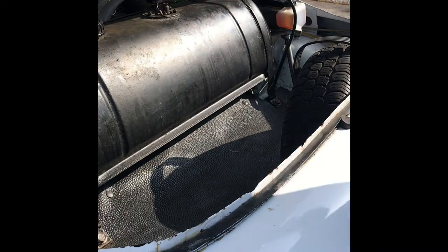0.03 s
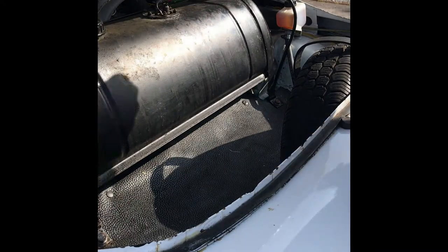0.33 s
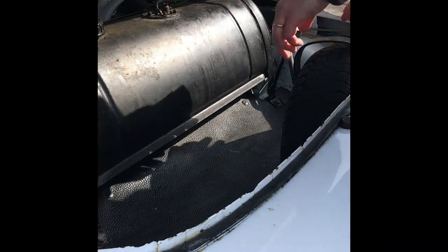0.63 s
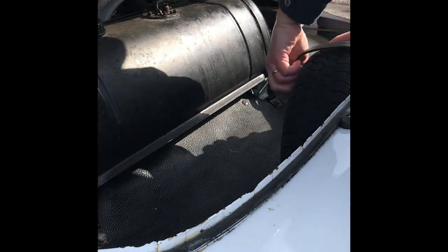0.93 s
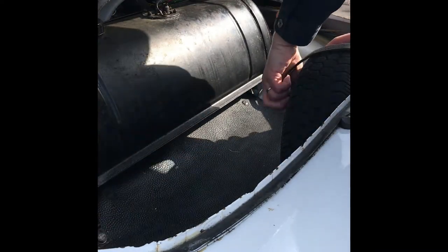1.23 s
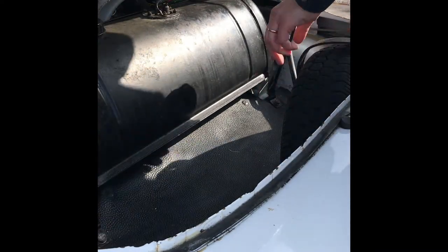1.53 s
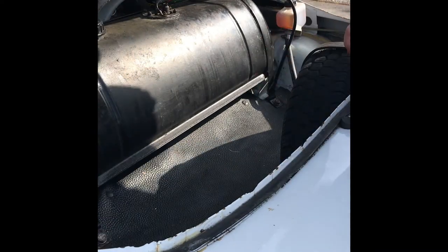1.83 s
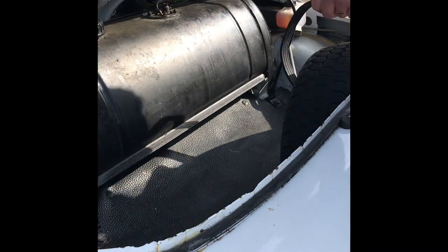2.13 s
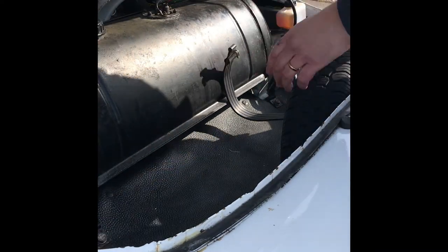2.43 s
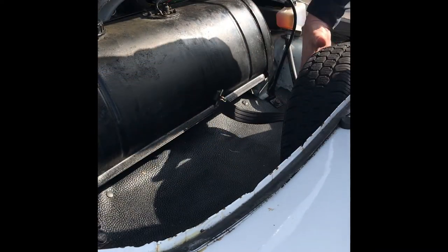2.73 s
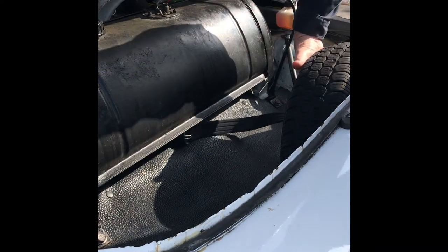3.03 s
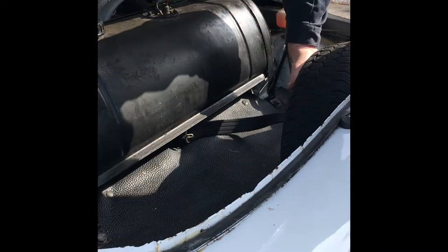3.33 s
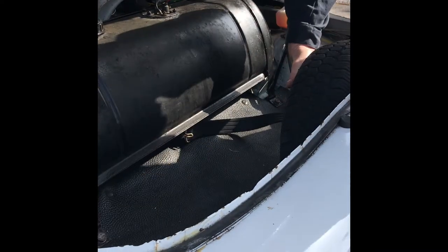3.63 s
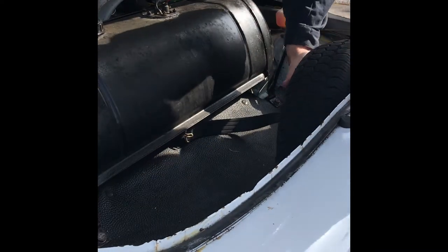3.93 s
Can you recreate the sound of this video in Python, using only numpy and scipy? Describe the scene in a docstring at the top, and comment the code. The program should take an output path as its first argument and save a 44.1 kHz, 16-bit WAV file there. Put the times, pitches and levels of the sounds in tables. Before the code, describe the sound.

Hands work a buckled strap around a spare tyre, bumping panels as birds chirp faintly.

```python
"""A strap is worked by hand around a spare tyre in an open car compartment, outdoors.
Its buckle clinks; it drops, scrapes along and its metal end clacks down. Each hit is decaying modes
plus a noise burst. Knuckles bump the panels and make the compartment boom; small contacts tick.
Sleeves and webbing rustle in tiny slips. Behind it all, small birds chirp over a low rumble."""
import sys
import numpy as np
from scipy import signal
from scipy.fft import rfft, irfft
from scipy.io import wavfile

SR = 44100
rng = np.random.default_rng(int(sys.argv[2]) if len(sys.argv) > 2 else 0)


def generate_wav(sig):
    """Save sig (samples, or channels by samples) to the path in sys.argv[1] as 16-bit PCM at SR."""
    pcm = np.round(np.clip(np.atleast_2d(sig).T, -1, 1) * 32767).astype(np.int16)
    wavfile.write(sys.argv[1], SR, pcm)


N = 176400

# Spectra of air, friction and hits. Each row: frequency in Hz, relative level in dB.
AIR_COLOUR = [(20, -28), (55, 5.5), (75, 0), (170, -9), (400, -17.5), (900, -22.5), (2000, -33.5),
              (15500, -44)]
RUSTLE_BODY_COLOUR = [(150, -10.5), (300, -13.5), (500, 3.5), (850, 5.5), (2500, 1.5), (6000, -16)]
RUSTLE_HISS_COLOUR = [(1500, -27), (3500, 10.5), (6000, 5), (10000, 6), (15500, 0)]
DRAG_COLOUR = [(120, -47), (371, -11), (534, 8.5), (1680, 2), (2210, -13), (15500, -15)]
SLIP_COLOUR = [(120, -33), (544, -5), (1070, -3), (2210, -17.5), (3240, -7.5), (4750, -15), (15500, -25)]
SLEEVE_COLOUR = [(59, -17), (140, -9.5), (310, -1.5), (520, -17), (1000, -18.5), (1260, -13), (1900, -23.5),
                 (15500, -34)]
PULL_COLOUR = [(120, -21.5), (575, -14), (890, 7), (1130, -5), (1540, 3), (1680, -4.5), (8980, -7),
               (15500, -14)]
CLINK_COLOUR = [(700, 18), (1600, 13.5), (2500, 0), (3600, 2), (11000, -12.5), (15000, -15)]
SNAP_COLOUR = [(88, -41), (150, -10.5), (1020, -5), (1800, -13.5), (3040, -4), (5650, -4), (8010, -6.5),
               (15500, -13)]
DROP_COLOUR = [(88, -33), (150, -28), (656, -13), (1090, -2.5), (1660, -11), (15500, -34.5)]
CLACK_COLOUR = [(120, -18), (200, -18), (488, -16), (957, -2.5), (1800, -9), (3750, -3.5), (5010, -22.5),
                (9310, -2), (15500, -12.5)]
# Modes of compartment air, panels, buckle and metal end.
# Each row: frequency in Hz, relative level in dB, T60 in seconds (capped at MAX_MODE_T60_S).
BOOM_MODES = [(119.1, 3.5, .47), (149, -7, .38)]
PANEL_MODES = [(191.6, 2, 0.095), (227.1, -2, 0.48), (270.1, -0.5, .3), (349, -2, 0.24), (466.3, 1, 0.13),
               (593, 1.5, 0.14), (680, 7.5, 0.046), (1213, 3.5, 0.032), (1600, 2, 0.099)]
CLINK_MODES = [(12020, -9.5, 0.038), (4920, -8, 0.03), (2380, -6.5, 0.027), (2067, -2, 0.065),
               (1934, -7.5, 0.084)]
CLACK_MODES = [(927, -1.5, 0.17), (1237, -0.5, 0.14), (1368, 2.5, 0.12), (1876, 0, 0.12), (3360, -5, 0.06),
               (8570, -1, 0.064)]
# Bird notes. Each row: start and length in seconds, first and target pitch in Hz,
# glide time constant in seconds, level in dB, roughness factor.
CHIRPS = [(-.02, 0.077, 4770, 4384, 0.029, -51.5, 3.9), (0.069, 0.069, 4800, 2910, .044, -49, 1.25),
          (0.08, 0.053, 5520, 5550, 0.015, -56, 0.25), (0.128, 0.12, 7950, 6340, 0.035, -57.5, .45),
          (0.31, .026, 7270, 7000, 0.026, -57.5, 0.68), (.361, 0.11, 6000, 5110, 0.0099, -45, .35),
          (0.461, 0.063, 5420, 5010, 0.041, -47, 0.41), (0.751, 0.094, 5015, 3110, .05, -50.5, 1.08),
          (2.651, 0.093, 4875, 3180, 0.048, -52, 0.97)]
# Light cloth moves. Each row: start and length in seconds, body and hiss level in dB.
RUSTLES = [(0.425, 0.29, -56.5, -64), (0.581, 0.088, -48.5, -57), (0.71, 0.12, -75, -62),
           (0.753, 0.013, -46, -62), (0.93, 0.27, -79, -63), (1.181, 0.042, -61, -65),
           (1.337, 0.073, -57.5, -63.5), (1.848, 0.25, -63, -78), (2.286, 0.052, -59.5, -57),
           (2.408, 0.052, -50.5, -49), (2.465, .33, -65, -58.5), (2.705, 0.05, -47.5, -57),
           (2.879, 0.23, -52.5, -57.5), (3.146, 0.53, -62, -66.5), (3.453, 0.029, -70, -62),
           (3.55, 0.042, -58.5, -54.5), (3.791, 0.029, -45.5, -64)]
# Firm strokes. Each row: start and length in seconds, first and last level in dB, colour.
RUBS = [(2.805, 0.052, -33.5, -32.5, DRAG_COLOUR), (2.836, .043, -39, -25.5, SLIP_COLOUR),
        (3.677, 0.09, -47.5, -36.5, SLEEVE_COLOUR), (3.774, .068, -43.5, -32, SLEEVE_COLOUR),
        (3.948, 0.053, -36.5, -28.5, PULL_COLOUR)]
# Small contacts. Each row: start in seconds, level in dB, centre in Hz.
TICKS = [(.249, -51.5, 1760), (0.471, -49.5, 2700), (.502, -37.5, 1260), (0.561, -48, 3100),
         (0.684, -43.5, 2100), (2.729, -39.5, 4250), (2.765, -39, 4060), (2.977, -35.5, 2650),
         (2.988, -36.5, 1270), (3.135, -48, 880), (3.157, -42, 2700), (3.267, -52, 6170)]
# Panel bumps. Each row: start in seconds, boom and panel level in dB, centre in Hz (higher is harder).
BUMPS = [(.003, -40, -44.5, 600), (.252, -56, -50.5, 660), (.778, -46, -42, 397), (0.851, -44.5, -46, 470),
         (0.925, -36.5, -33, 255), (1.128, -38.5, -50, 302), (1.447, -43.5, -42, 515),
         (1.477, -33.5, -42, 340), (1.552, -39.5, -44, 497), (1.892, -37.5, -38, 456),
         (1.938, -37.5, -44.5, 393), (2.005, -42.5, -45.5, 223), (2.295, -43.5, -49.5, 190),
         (2.407, -36, -38.5, 230), (2.897, -41.5, -39.5, 182), (3.071, -35.5, -45, 224),
         (3.541, -46.5, -52.5, 200), (3.985, -31, -35.5, 274)]
# Buckle clinks. Each row: start, rattle length and rise in seconds, crack and ring level in dB,
# tilt in dB per octave.
CLINKS = [(0.883, .006, 0.00084, -44, -66, 7), (0.9077, 0.012, 0.00063, -33, -38.5, 7),
          (1.464, 0.015, 0.00093, -36.5, -54, 6), (1.712, 0.021, 0.0078, -49, -62, 8),
          (1.884, 0.006, 0.0018, -45, -44, 4.5), (1.91, 0.075, 0.0035, -52.5, -56, 2),
          (2.073, 0.03, 0.014, -46.5, -50.5, 4)]
# Strap hits. Each row: start in seconds, crack level in dB, crack T60 at 1 kHz in seconds,
# ring level in dB, colour, modes.
BLOWS = [(2.356, -27.5, 0.32, -46, SNAP_COLOUR, CLACK_MODES),
         (2.395, -28, 0.18, -35.5, DROP_COLOUR, PANEL_MODES),
         (3.0072, -24, 0.24, -27.5, CLACK_COLOUR, CLACK_MODES)]

MAX_MODE_T60_S, TREBLE_DAMPING_EXPONENT = .3, .66
ONSET_SAMPLES = 882


def undb(db):
    """Decibels to gain."""
    return 10 ** (np.asarray(db) / 20)


def unit(x, size=None):
    """Scale to rms 1 over the first size samples."""
    return x / np.sqrt(np.mean(x[:size] ** 2) + 1e-18)


def clock(size=N // 8):
    """Sample times in seconds."""
    return np.arange(size) / SR


def add(out, start_s, x):
    """Mix x in at start_s."""
    i = int(start_s * SR)
    x = x[max(-i, 0):max(N - i, 0)]
    out[max(i, 0):max(i, 0) + len(x)] += x


def colour(x, points):
    """Filter by a (Hz, dB) curve, to rms 1."""
    hz, db = np.array(points).T
    bins_hz = np.maximum(np.fft.rfftfreq(len(x), 1 / SR), 1)
    gain = undb(np.interp(np.log(bins_hz), np.log(hz), db))
    return unit(irfft(rfft(x) * gain, len(x)))


def tilt(rows, db_per_oct):
    """Brighten a colour or a set of modes."""
    return [(hz, db + db_per_oct * np.log2(hz), *rest) for hz, db, *rest in rows]


def around(hz):
    """Broad colour peaking at hz."""
    return [(hz / 4, -16), (hz, 0), (hz * 2, -5), (hz * 16, -34)]


def walk(rate_hz, size=N):
    """Smooth random curve, spread near 1."""
    return np.interp(clock(size) * rate_hz, np.arange(2048), rng.standard_normal(2048))


def gate(t, length_s, rise_s, fall_s):
    """Linear rise, hold, exponential fall."""
    return np.clip(t / rise_s, 0, 1) * np.exp(-np.maximum(t - length_s, 0) / fall_s)


def slips(per_s, spread_db, size=N):
    """Friction: random impulses of uneven strength."""
    impulses = (rng.random(size) < per_s / SR) * rng.standard_normal(size)
    return impulses * undb(spread_db * np.minimum(rng.exponential(size=size), 4))


def ring(modes, scatter_db=0, detune=0):
    """Decaying modes; their mix varies with where the blow lands, drawn at random."""
    t, out = clock(), 0
    for (hz, db, t60_s), (level, pitch, sign) in zip(modes, rng.standard_normal((len(modes), 3))):
        decay = undb(-60 * t / min(t60_s, MAX_MODE_T60_S))
        tone = np.sin(2 * np.pi * hz * (1 + detune * pitch) * t)
        out = out + np.sign(sign) * undb(db + scatter_db * level) * decay * tone
    return unit(out, ONSET_SAMPLES)


def crack(points, t60_1khz_s, hold_s=0):
    """Dense ringing of the compartment after a contact; the treble dies first."""
    t, out = clock(), 0
    spectrum = rfft(colour(rng.standard_normal(len(t)), points))
    bin_octave = np.clip(np.log2(np.fft.rfftfreq(len(t), 1 / SR) / 1000 + 1e-9), -3, 4)
    for octave in range(-3, 5):
        band = irfft(spectrum * np.maximum(1 - abs(bin_octave - octave), 0), len(t))
        t60_s = t60_1khz_s * 2 ** (-octave * TREBLE_DAMPING_EXPONENT)
        out = out + band * undb(-60 * np.maximum(t - hold_s, 0) / t60_s)
    return unit(out, ONSET_SAMPLES)


def echoes(x, decay_s):
    """Diffuse reflections: convolve with decaying noise of unit energy."""
    t = clock()
    response = rng.standard_normal(len(t)) * np.exp(-t / decay_s)
    return signal.fftconvolve(x, response / np.linalg.norm(response))[:N]


def walls(x, wet_db=-3.5):
    """Close reflections off tank and panels: a hollow colour."""
    return (x + undb(wet_db) * echoes(x, decay_s=.0073)) / np.hypot(1, undb(wet_db))


def air(level_db=-50, swell_db=4):
    """Low outdoor rumble with faint hiss."""
    return undb(level_db + swell_db * walk(4.076)) * colour(rng.standard_normal(N), AIR_COLOUR)


def birds(echo_t60_s=.42, echo_db=-.5):
    """Thin, rasping, gliding whistles that echo around the yard."""
    out, t = np.zeros(N), clock()
    for start_s, length_s, first_hz, target_hz, glide_s, db, roughness in CHIRPS:
        warble, rasp = .04 * walk(170, len(t)), .04 * walk(1500, len(t))
        glide_hz = target_hz + (first_hz - target_hz) * np.exp(-t / glide_s)
        hz = glide_hz * (1 + roughness * (warble + rasp))
        arch = np.sqrt(abs(np.sin(np.pi * np.minimum(t / length_s, 1))))
        swell = arch * undb(db + 4 * walk(93, len(t)))
        add(out, start_s, np.sqrt(2) * swell * np.sin(2 * np.pi * np.cumsum(hz) / SR))
    return out + undb(echo_db) * echoes(out, decay_s=echo_t60_s / np.log(1000))


def rustles(flutter_db=2.6):
    """Sleeves and webbing slide lightly in short moves."""
    t, body_gain, hiss_gain = clock(N), 0, 0
    for start_s, length_s, body_db, hiss_db in RUSTLES:
        move = gate(t - start_s, length_s, rise_s=.018, fall_s=.028)
        body_gain += undb(body_db) * move
        hiss_gain += undb(hiss_db) * move
    body = colour(slips(per_s=5000, spread_db=1.2), RUSTLE_BODY_COLOUR)
    hiss = colour(slips(per_s=5000, spread_db=1.2), RUSTLE_HISS_COLOUR)
    return undb(flutter_db * walk(70)) * (body_gain * body + hiss_gain * hiss)


def rubs(flutter_db=.96):
    """Strap and arm rub firmly: dense slips grow with the pull and stop short."""
    out, t = np.zeros(N), clock()
    for start_s, length_s, first_db, last_db, points in RUBS:
        force_db = np.interp(t, [0, length_s], [first_db, last_db]) + flutter_db * walk(156, len(t))
        friction = colour(slips(per_s=14000, spread_db=1, size=len(t)), points)
        add(out, start_s, undb(force_db) * gate(t, length_s, rise_s=.0094, fall_s=.01) * friction)
    return out


def ticks(decay_s=.0005, tail_db=-2.5):
    """Small sharp contacts, each with a short hollow tail."""
    out, t = np.zeros(N), clock()
    for start_s, db, hz in TICKS:
        snap = unit(np.exp(-t / decay_s) * np.cos(2 * np.pi * hz * t), size=300)
        tail = unit(crack(around(hz), t60_1khz_s=.069), size=300)
        add(out, start_s, undb(db) * unit(snap + undb(tail_db) * tail, size=300))
    return out


def panel_bumps(rise_s=.0014, focus_db_per_oct=10, thud_db=-10):
    """Knuckles thud, boom the compartment air and ring the panel modes near the bump's centre pitch."""
    out = np.zeros(N)
    push = 1 - np.exp(-clock() / rise_s)
    for start_s, boom_db, panel_db, centre_hz in BUMPS:
        modes = [(hz, db - focus_db_per_oct * abs(np.log2(hz / centre_hz)), t60_s)
                 for hz, db, t60_s in PANEL_MODES]
        ringing = ring(modes, scatter_db=3, detune=.02)
        thud = undb(thud_db) * crack(around(centre_hz), t60_1khz_s=.15)
        panel = unit(ringing + thud, ONSET_SAMPLES)
        boom = ring(BOOM_MODES, detune=.02)
        add(out, start_s, push * (undb(boom_db) * boom + undb(panel_db) * panel))
    return out


def buckle(contacts_per_s=500):
    """The loose buckle chatters; each contact renews its high ring."""
    out, t = np.zeros(N), clock()
    for start_s, length_s, rise_s, crack_db, ring_db, db_per_oct in CLINKS:
        swell = np.minimum(t / rise_s, 1)
        touching = (rng.random(len(t)) < contacts_per_s / SR) * (t < length_s)
        contacts = touching * rng.standard_normal(len(t))
        contacts[0] = 1
        jingle = signal.fftconvolve(contacts, ring(tilt(CLINK_MODES, db_per_oct)))[:len(t)]
        jingle = unit(swell * jingle, ONSET_SAMPLES + int(length_s * SR))
        burst = swell * crack(tilt(CLINK_COLOUR, db_per_oct), t60_1khz_s=.21, hold_s=length_s / 2)
        add(out, start_s, undb(crack_db) * burst + undb(ring_db) * jingle)
    return out


def strap_blows():
    """The strap and its metal end strike tank and floor: a crack plus ringing modes."""
    out = np.zeros(N)
    for start_s, crack_db, t60_1khz_s, ring_db, points, modes in BLOWS:
        add(out, start_s, undb(crack_db) * crack(points, t60_1khz_s) + undb(ring_db) * ring(modes))
    return out


def scene():
    """Close mono mix."""
    rumble = air()
    hits = buckle() + panel_bumps() + strap_blows() + ticks()
    friction = walls(rustles() + rubs())
    return (rumble + hits + friction + birds())[None]


def record(dry):
    """Steep elliptic low-pass."""
    cutoff_hz = 15900
    return signal.sosfilt(signal.ellip(10, .2, 80, cutoff_hz, fs=SR, output="sos"), dry)


dry = scene()
out = record(dry)
generate_wav(out)
```